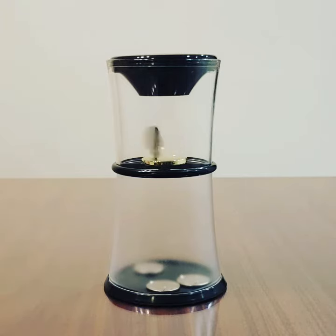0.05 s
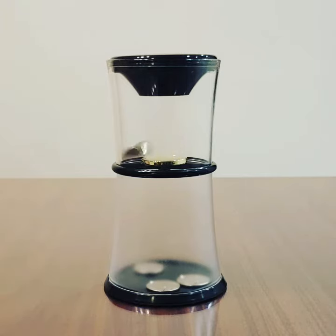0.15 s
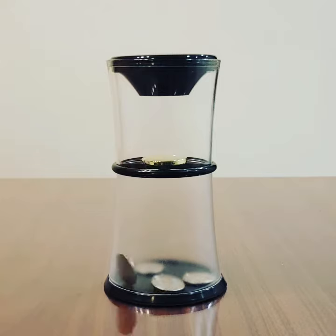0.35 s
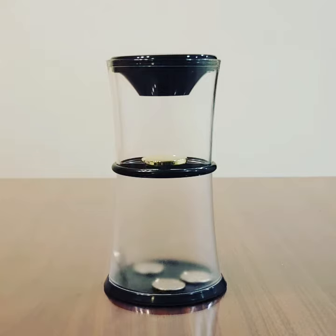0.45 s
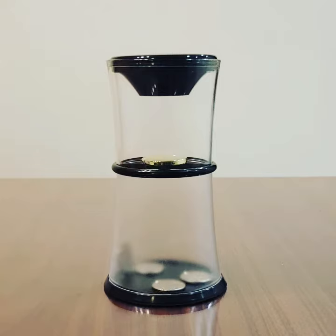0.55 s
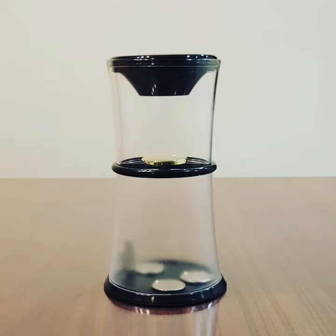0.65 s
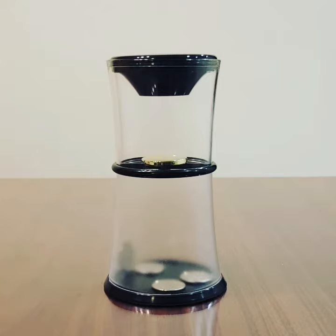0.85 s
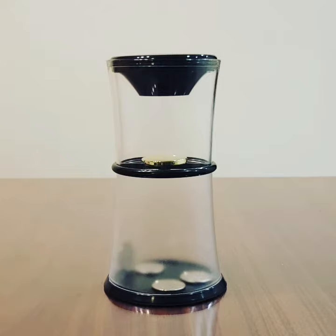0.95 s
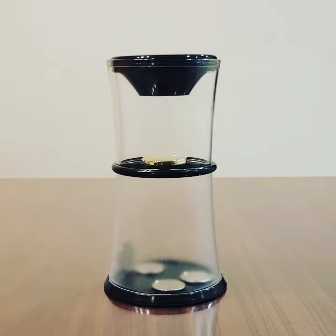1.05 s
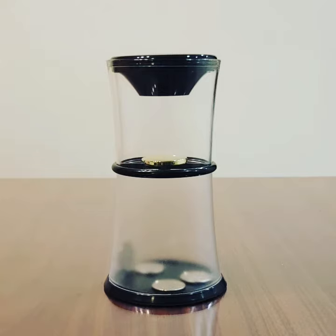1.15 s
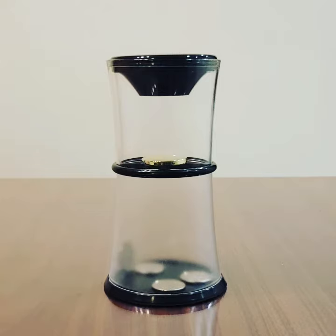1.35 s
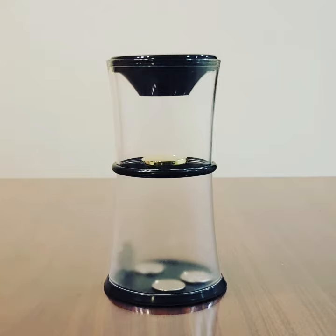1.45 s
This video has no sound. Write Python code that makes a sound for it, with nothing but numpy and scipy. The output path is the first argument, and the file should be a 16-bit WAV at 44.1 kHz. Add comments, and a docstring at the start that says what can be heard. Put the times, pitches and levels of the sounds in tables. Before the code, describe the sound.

Coin drop in a small plastic bank: faint roll, quick knocks, loud clattering landing, then quiet

```python
"""A quiet, bare room: a coin rolls round the inner shelf of a plastic coin bank on a table, knocks its
way through and falls to the base among the other coins; the landing leaves a diffuse, dying tail.
Knocks and random small contacts ring the bank's damped modes; filtered noise makes ticks, scrape,
room tone and rumble. The right microphone port favours about 300-3000 Hz."""
import sys
import numpy as np
from scipy import signal
from scipy.fft import rfft, irfft
from scipy.io import wavfile

SR = 44100
rng = np.random.default_rng(int(sys.argv[2]) if len(sys.argv) > 2 else 0)


def volts(x):
    """Linear amplitude factor 10**(x/20) for a level x in dB, scalar or array-like."""
    e = np.asarray(x, float) / 20
    return 10 ** e


def pcm_store(signal):
    """Save signal as 16-bit PCM."""
    levels = np.round(np.clip(np.atleast_2d(signal), -1, 1) * 32767)
    wavfile.write(sys.argv[1], SR, levels.astype(np.int16).T)


N = 66150

# coin knocks, peak levels: (time [s], 900-1800 Hz ring [dB], 650-900 Hz ring [dB],
# ring above 1800 Hz [dB], treble tick [dB])
KNOCK_EVENTS = [(0.0415, -37.5, -36, -41, -84), (0.1429, -45.5, -54, -47.5, -89),
                (0.26, -35, -22, -24, -38.5), (.2635, -29.5, -30, -21, -31),
                (0.2766, -33, -17.5, -13.5, -22), (0.2787, -31.5, -11.5, -23.5, -32.5),
                (0.302, -25, -20, -26, -40), (0.3076, -23, -21, -15.5, -23),
                (0.3328, -34.5, -31, -21.5, -38.5), (0.338, -33, -22, -31, -43),
                (0.4119, -27, -36.5, -17.5, -25), (0.4356, -7.5, -14, -13.5, -16),
                (0.444, -18.5, -16.5, -22, -29), (0.4496, -17, -30.5, -17.5, -24.5),
                (0.456, -25.5, -29.5, -11, -26.5), (.487, -28.5, -31.5, -18.5, -27),
                (0.553, -48.5, -41, -56, -29.5), (.580, -32, -41, -26.5, -31.5),
                (.601, -34, -42, -27, -36.5), (0.631, -43, -39, -30.5, -37),
                (.709, -71.5, -46.5, -38.5, -64)]
# rolling and scraping on the shelf, rms levels: (time [s], below 500 Hz [dB], 500-900 Hz [dB],
# 1200-2200 Hz [dB], 2250-2950 Hz [dB], treble [dB])
ROLL_LEVELS = [(0, -40, -38, -48.5, -65.5, -95), (.04, -53.5, -82, -63.5, -69.5, -87),
               (.048, -39, -44, -47.5, -54, -81), (.083, -41, -49, -52, -55.5, -83),
               (.095, -49, -63, -64, -66, -84.5), (.17, -45.5, -60, -58.5, -71, -83.5),
               (.195, -53, -67.5, -65, -68, -99.5), (.205, -41.5, -41.5, -54, -63, -90),
               (.225, -53.5, -39, -42.5, -33.5, -63), (.24, -39.5, -32, -44.5, -33.5, -55),
               (.268, -50, -38, -32.5, -36.5, -50), (.29, -53.5, -38.5, -39, -41.5, -57.5),
               (.345, -51, -41.5, -37, -42.5, -55), (.36, -58, -58, -46.5, -59.5, -61),
               (.41, -69, -62.5, -59.5, -46.5, -64.5)]
# nominal modes of the bank: (frequency [Hz], relative level [dB], t60 [s])
BANK_MODES = [(287.5, -5.5, .1), (355.8, 0.5, 0.07), (431, -6, 0.062), (578, 0.5, 0.024), (670, 6, 0.021),
              (811, 0, 0.028), (1168.3, 2, 0.041), (1335, -2, .03), (1515, -3.5, 0.025),
              (1656, -0.5, 0.017), (2048, 2.5, 0.013), (2357, 7, 0.026), (2554, 3.5, .015),
              (2868, -2.5, 0.0093)]
# diffuse tail of the landing, rms levels: (time [s], ring above 900 Hz with click wash [dB],
# ring below 900 Hz [dB], treble [dB])
TAIL_LEVELS = [(.446, -22, -45.5, -33), (.5, -33, -40, -42.5), (.6, -41.5, -53, -56),
               (.69, -50.5, -53, -73), (.86, -66, -76.5, -105), (.96, -79, -79, -110)]
# treble colour of ticks, scrape and tail: (frequency [Hz], relative level [dB per Hz])
TREBLE_SPECTRUM = [(1760, -28), (3000, 1), (5950, -10), (6570, -11), (8090, -20.5), (9800, -13),
                   (13200, -10), (15700, -20), (16000, -49)]
# colour of the dense clicks in the landing tail: (frequency [Hz], relative level [dB per Hz])
CLICK_WASH_SPECTRUM = [(150, -36), (250, -9.5), (563, -1), (686, -8), (1170, 4), (1340, -4), (1970, 5.5),
                       (2790, -17.5), (4000, -17.5), (5600, -64.5)]
# slide of the upper rolling band as the coin circles in: (time [s], shift [Hz])
ROLL_SLIDE = [(0.241, 115), (0.269, -22)]
# room decay: (frequency [Hz], t60 [s])
ROOM_DECAY = [(3000, 0.49), (6000, .6), (10000, 0.42)]
# room tone colour: (frequency [Hz], relative level [dB per Hz])
HUSH_SPECTRUM = [(15, -49), (65, -13.5), (138, -9), (232, -7), (368, -17), (1180, -34.5), (1980, -14.5),
                 (2670, -40), (8830, -52), (15600, -35), (16000, -64.5)]
# low rumble: (time [s], rms level [dB])
RUMBLE_LEVELS = [(0, -59), (.1, -53), (.2, -63.5), (.29, -52), (.38, -60.5), (.5, -61), (1.5, -76)]
# rumble resonances: (frequency [Hz], half-width at half amplitude [Hz], relative level [dB])
RUMBLE_RESONANCES = [(72.26, 19, -2), (133, 23, -3)]
# background likeness of the ports: (frequency [Hz], left-right correlation [-1..1])
PORT_LIKENESS = [(60, 0.65), (130, 1), (290, 1), (1400, 0)]
# port balance: (frequency [Hz], left minus right [dB])
PORT_BALANCE = [(60, -2.5), (180, -2.5), (310, -5), (550, -12.5), (950, -0.5), (1650, -15.5), (2860, -11),
                (4970, 6.5), (15000, 0)]

HUSH_DB = -70
ROOM_GAP_S, TICK_ROOM_DB, RING_ROOM_DB = 0.014, -1.5, -16  # silence before the tail; sends to it
TABLE_HZ, TABLE_DB, TABLE_T60_S, TABLE_START_S, TABLE_SWELL_S = 131, -39.5, 0.5, 0.44, 0.022
THIN_HZ, THIN_HALF_WIDTH_HZ, THIN_DB = 4450, 150, -77.5
FIZZ_LOW_HZ, FIZZ_DB = 10670, -78.5
FAINT_T60_S = 0.74  # thin tone and fizz
RING_HIGHPASS_HZ = 194  # high-pass of the rings, keeps their onsets free of low thumps
SWELL_S, SOFT_SWELL_S, SOFT_UNTIL_S = 0.00075, 0.0012, 0.2  # glancing first knocks rise slowly
DETUNE = 0.013  # each excitation finds each mode at -2 to +1 times this fraction
NEAR_LEFT_DB = -7  # left port's loss of the near ring
ROLL_PER_S, ROLL_SPREAD_DB = 2700, 3
SING, EDGE_DB = 1.7, -5.5  # factor on the 2.4 kHz mode's t60; gain of the modes above it
SINK_S, SINK_WIDTH_S = 0.098, 0.011  # drone sinks to the lowest mode
TAIL_PER_S, TAIL_SPREAD_DB = 1500, 3
CLICK_WASH_DB = 5  # re the landing tail's ring above 900 Hz
FALL_S = 0.4  # before it the coin strikes the shelf, after it the base
DEEP_DB = -15  # modes below 500 Hz, re the 650-900 Hz ring
TICK_S = 0.0011  # tick peaks at half of this


def evened(x):
    """Scales to rms 1."""
    return x / np.sqrt(np.mean(x ** 2) + 1e-20)


def read(points, hz):
    """Reads a table on a log-frequency axis."""
    f, value = np.transpose(points)
    return np.interp(np.log(hz + 1), np.log(f + 1), value)


def level(rows, column):
    """Gain over time from one dB column; silent outside the table."""
    rows = np.array(rows)
    return volts(np.interp(np.arange(N) / SR, rows[:, 0], rows[:, column], left=-200, right=-200))


def shaped(x, points):
    """Colours x by a spectrum in dB."""
    size = x.shape[-1]
    return irfft(rfft(x) * volts(read(points, np.fft.rfftfreq(size, 1 / SR))), size)


def resonance(hz, centre_hz, half_width_hz):
    """Amplitude response of one spectral peak."""
    return 1 / (1 + ((hz - centre_hz) / half_width_hz) ** 2)


def clicks(per_s, spread_db):
    """Random small contacts in each port, a few of them large."""
    hit = rng.random((2, N)) < per_s / SR
    sign = rng.choice([-1, 1], (2, N))
    size_db = spread_db * np.minimum(rng.exponential(1, (2, N)), 4)
    return hit * sign * volts(size_db)


def ring(push, lo_hz, hi_hz, damp=1, swell_s=SWELL_S):
    """Decaying sines: the bank's modes from lo_hz to hi_hz, each port in another phase."""
    t, out = np.arange(6000) / SR, np.zeros((2, 6000))
    for hz, db, t60_s in BANK_MODES:
        if lo_hz <= hz < hi_hz:
            mode_hz = hz * (1 + DETUNE * rng.uniform(-2.0, 1))
            wave = np.sin(2 * np.pi * (mode_hz * t + rng.random((2, 1))))
            out += volts(db - 60 * t / (t60_s * damp)) * wave
    out *= (1 - np.exp(-t / swell_s)) ** 2
    out = signal.sosfilt(signal.butter(2, RING_HIGHPASS_HZ, 'high', fs=SR, output='sos'), out)
    return signal.fftconvolve(push, out, axes=1)[:, :max(push.shape[1], 6000)]


def hush():
    """Noise as room tone and low rumble, alike in both ports in the bass."""
    hz = np.fft.rfftfreq(N, 1 / SR)
    a, b, c, d = rfft(rng.standard_normal((4, N)))
    same = np.clip(read(PORT_LIKENESS, hz), -1, 1)
    other = np.sqrt(1 - same ** 2)
    tone = irfft(np.array([a, same * a + other * b]) * volts(read(HUSH_SPECTRUM, hz)), N)
    peaks = sum(volts(db) * resonance(hz, f, w) for f, w, db in RUMBLE_RESONANCES)
    rumble = irfft(np.array([c, same * c + other * d]) * peaks, N)
    return volts(HUSH_DB) * evened(tone) + level(RUMBLE_LEVELS, 1) * evened(rumble)


def room(x):
    """Convolves with a noise tail for each port, dying band by band."""
    taps = rng.standard_normal((2, SR)) * (np.arange(SR) > ROOM_GAP_S * SR)
    hz, t, z = signal.stft(taps, SR, nperseg=256)
    decay = volts(-60 * t / read(ROOM_DECAY, hz)[:, None])
    tail = signal.istft(z * decay, SR, nperseg=256)[1]
    return signal.fftconvolve(x, tail / np.linalg.norm(tail[0]), axes=1)[:, :N]


def faint_tones():
    """Narrow-band noise in the right port and high hiss in both, fading together."""
    noise, hz = rng.standard_normal((2, N)), np.fft.rfftfreq(N, 1 / SR)
    thin = evened(irfft(rfft(noise[0]) * resonance(hz, THIN_HZ, THIN_HALF_WIDTH_HZ), N))
    fizz = evened(irfft(rfft(noise) * volts(read(TREBLE_SPECTRUM, hz)) * (hz > FIZZ_LOW_HZ), N))
    right_only = np.array([[0], [1]])
    fade = volts(-60 * np.arange(N) / SR / FAINT_T60_S)
    return (right_only * thin * volts(THIN_DB) + fizz * volts(FIZZ_DB)) * fade


def table_boom():
    """The table top booms as one swelling, decaying sine."""
    t = np.maximum(np.arange(N) / SR - TABLE_START_S, 0)
    envelope = volts(TABLE_DB - 60 * t / TABLE_T60_S) * (1 - np.exp(-t / TABLE_SWELL_S))
    return envelope * np.sin(2 * np.pi * TABLE_HZ * t)


def landing_tail():
    """Diffuse dying tail of the landing, built from dense clicks, ringing modes and noise."""
    push = clicks(TAIL_PER_S, TAIL_SPREAD_DB)
    wash = evened(shaped(clicks(TAIL_PER_S, TAIL_SPREAD_DB), CLICK_WASH_SPECTRUM))
    upper = evened(ring(push, 900, 9000)) + volts(CLICK_WASH_DB) * wash
    treble = shaped(rng.standard_normal((2, N)), TREBLE_SPECTRUM)
    parts = [upper, ring(push, 0, 900), treble]
    return sum(level(TAIL_LEVELS, k + 1) * evened(p) for k, p in enumerate(parts))


def rolling():
    """The coin's edge patters and scrapes along the shelf: contacts ring the modes, noise scrapes."""
    push, t = clicks(ROLL_PER_S, ROLL_SPREAD_DB), np.arange(N) / SR
    sunk = 1 / (1 + np.exp((SINK_S - t) / SINK_WIDTH_S))
    deep = sunk * evened(ring(push, 0, 320)) + (1 - sunk) * evened(ring(push, 320, 500))
    upper = ring(push, 2250, 2450, SING) + volts(EDGE_DB) * ring(push, 2450, 2950)
    shift_hz = np.interp(t, *np.transpose(ROLL_SLIDE))
    # single-sideband frequency shift
    upper = (signal.hilbert(upper) * np.exp(2j * np.pi * np.cumsum(shift_hz) / SR)).real
    scrape = shaped(rng.standard_normal((2, N)), TREBLE_SPECTRUM)
    parts = [deep, ring(push, 500, 900), ring(push, 1200, 2200), upper, scrape]
    return sum(level(ROLL_LEVELS, k + 1) * evened(p) for k, p in enumerate(parts))


def knocks():
    """Each knock sets the modes ringing and makes a bright noise tick: returns rings and ticks."""
    out, t, push = np.zeros((2, 2, N + 6000)), np.arange(6000) / SR, np.ones((2, 1))
    for s, mid_db, low_db, high_db, tick_db in KNOCK_EVENTS:
        swell_s = SOFT_SWELL_S if s < SOFT_UNTIL_S else SWELL_S
        tick = shaped(rng.standard_normal((2, 6000)), TREBLE_SPECTRUM)
        tick = tick * t / TICK_S * np.exp(-t / TICK_S * 2)
        if s < FALL_S:
            low = ring(push, 650, 760, swell_s=swell_s)
            high = ring(push, 1900, 2800, swell_s=swell_s)
        else:
            low = ring(push, 650, 900)
            high = ring(push, 1800, 2250) + ring(push, 2800, 9000)
        mid = ring(push, 900, 1800, swell_s=swell_s)
        deep = ring(push, 0, 500, swell_s=swell_s)
        parts = [mid, low, deep, high, tick]
        gains = volts(np.array([mid_db, low_db, low_db + DEEP_DB, high_db, tick_db]))
        parts = [g * p / abs(p).max(1, keepdims=True) for g, p in zip(gains, parts)]
        at = round(s * SR)
        out[:, :, at:at + 6000] += [sum(parts[:-1]), parts[-1]]
    return out[:, :, :N]


def scene():
    """Coin, bank, table and room."""
    rings, ticks = knocks()
    near = volts(np.array([[NEAR_LEFT_DB], [0]])) * (rings + rolling() + faint_tones())
    reverb = room(volts(RING_ROOM_DB) * rings + volts(TICK_ROOM_DB) * ticks)
    return near + ticks + reverb + landing_tail() + table_boom() + hush()


def roll_off(x):
    """The treble ends steeply here."""
    return signal.sosfilt(signal.butter(12, 16800, fs=SR, output="sos"), x)


def record(dry):
    """The two ports share the sound unevenly over frequency."""
    ratio = volts(read(PORT_BALANCE, np.fft.rfftfreq(N, 1 / SR)))
    share = np.array([ratio, np.ones_like(ratio)]) * 2 / np.sqrt(1 + ratio ** 2)
    mix = np.clip(irfft(rfft(dry) * share, N), -1, 1)
    return roll_off(mix)


dry = scene()
out = record(dry)
pcm_store(out)
```